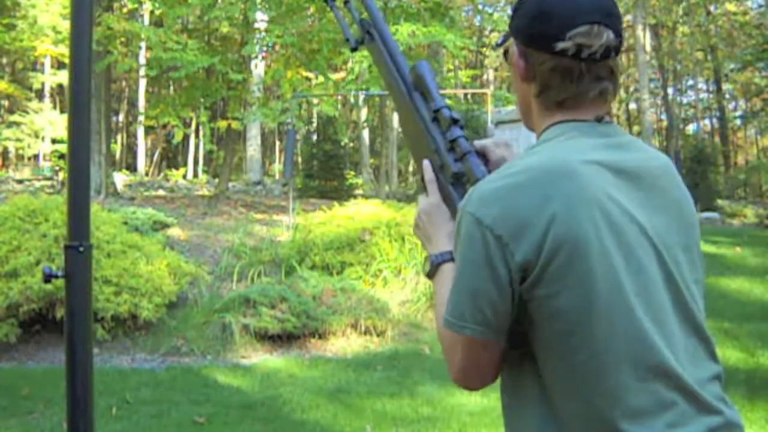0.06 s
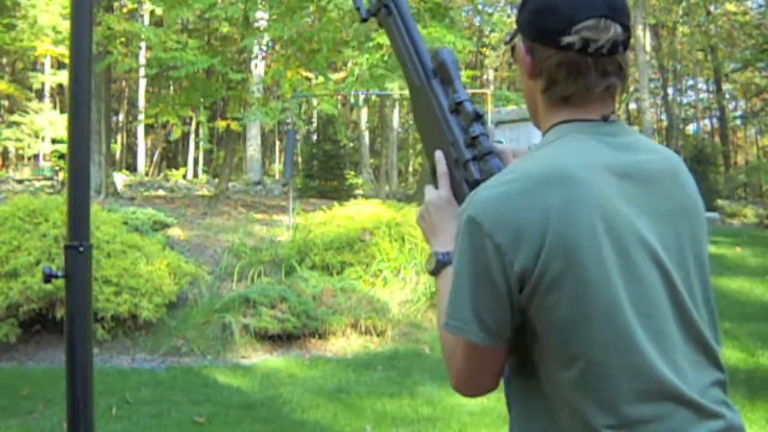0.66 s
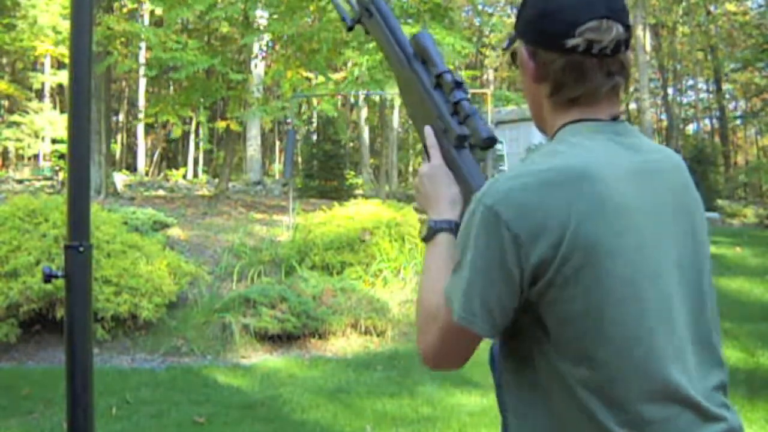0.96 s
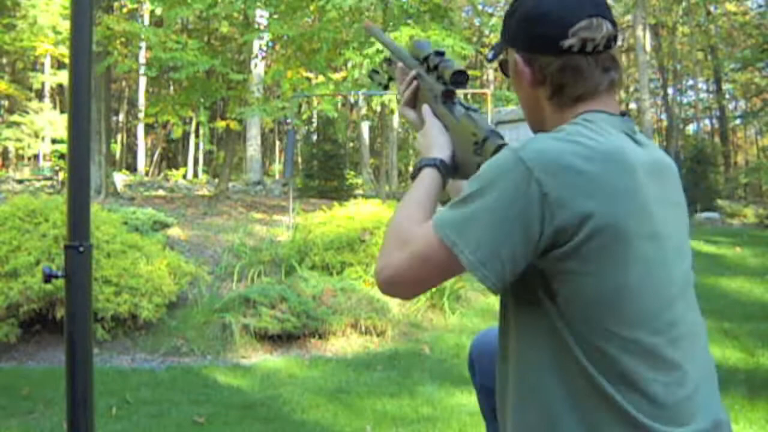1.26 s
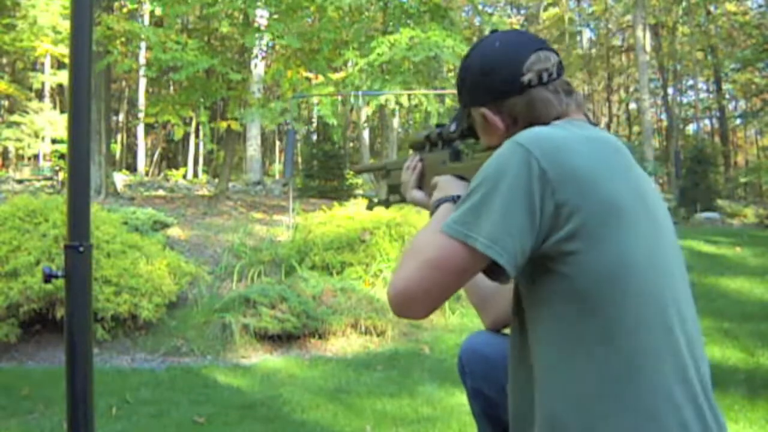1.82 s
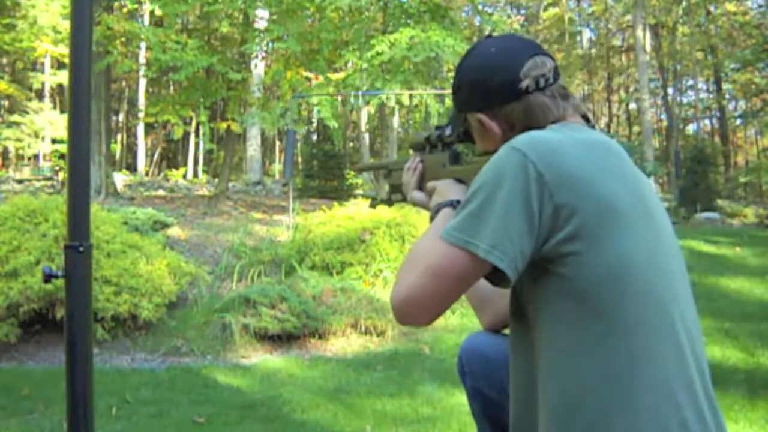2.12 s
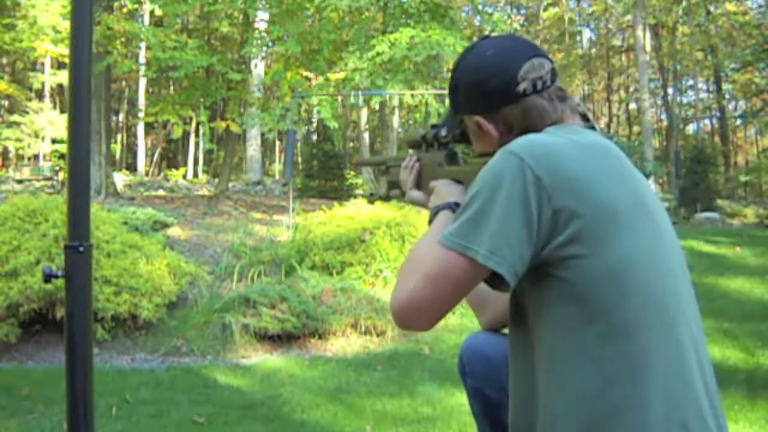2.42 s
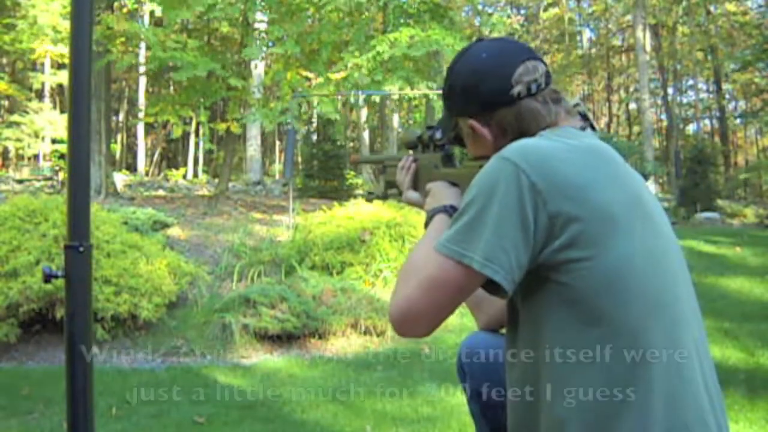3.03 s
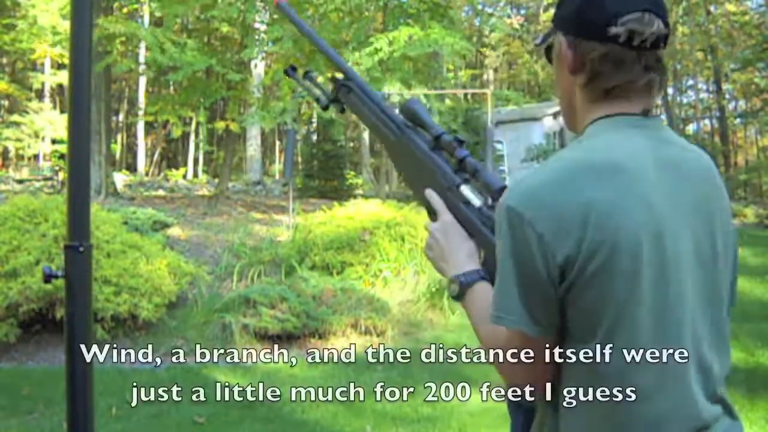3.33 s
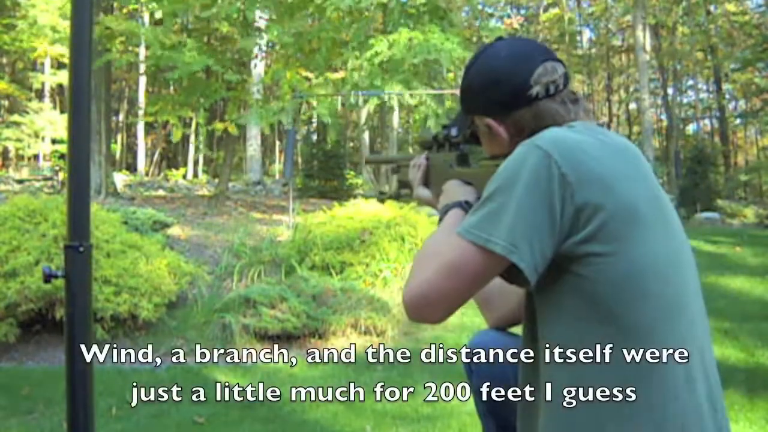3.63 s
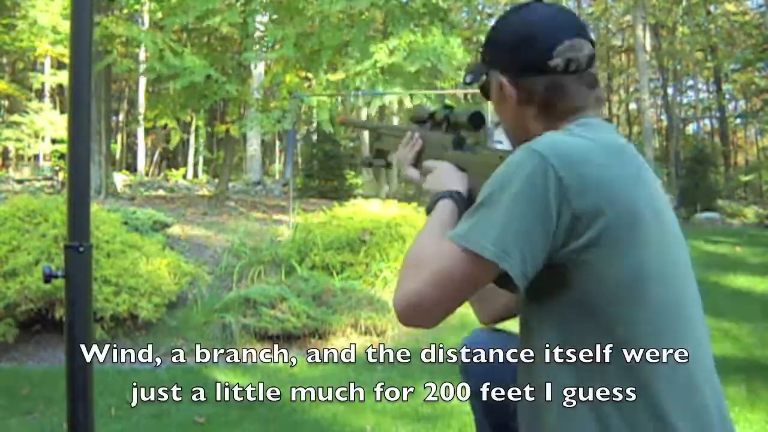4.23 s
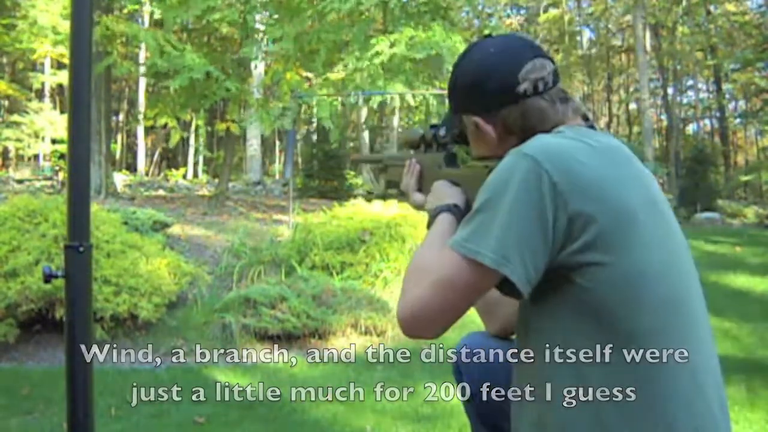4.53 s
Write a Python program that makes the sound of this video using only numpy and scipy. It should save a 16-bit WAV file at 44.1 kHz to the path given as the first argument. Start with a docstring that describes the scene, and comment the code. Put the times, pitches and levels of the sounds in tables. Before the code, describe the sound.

A spring air rifle is cocked with muffled metal clacks, then fires three quiet snaps with light bolt clicks, over soft outdoor hiss.

```python
"""Spring airsoft rifle in a garden

The rifle is cocked by hand: each impact excites the modes of the steel bolt and the hollow stock,
over dull hiss and wind on the microphone, all with almost no treble. Near 3 s the sound turns abruptly
quiet and full-range: the spring piston snaps three times and rings its air cylinder, with light bolt
ticks, the friction of a sleeve and soft bumps in between."""
import sys
import numpy as np
from scipy import signal
from scipy.fft import rfft, irfft, next_fast_len
from scipy.io import wavfile
from scipy.ndimage import uniform_filter1d

SR = 44100
rng = np.random.default_rng(int(sys.argv[2]) if len(sys.argv) > 2 else 0)


def wrap_up_sound(samples):
    """Save the sound to the file named by the first command line argument, as 16-bit audio."""
    columns = np.atleast_2d(samples).T
    # keep every value between -1 and 1, then stretch to whole-number steps
    tamed = np.clip(columns, -1, 1)
    steps = np.round(tamed * 32767).astype(np.int16)
    wavfile.write(sys.argv[1], SR, steps)


N = 206167
TIME = np.arange(N) / SR
AGE = np.arange(SR // 4) / SR  # time since an impact [s]

# Noise spectra, shape only: (frequency [Hz], spectral density [dB])
DULL_HISS_SPECTRUM = [(50, -20.5), (125, -5), (200, -2.5), (330, -3), (480, -2.5), (600, -1), (800, -2),
                      (1400, -5.5), (2200, -5.5), (3100, -5), (3800, -8), (4400, -30.5), (7000, -49.5)]
OPEN_HISS_SPECTRUM = [(25, -7), (70, -2), (120, 0), (220, 0), (310, -0.5), (450, 1.5), (600, -3),
                      (900, -6.5), (1700, -7), (3200, -8), (4700, -5.5), (6300, -6.5), (10000, -10.5),
                      (15800, -12.5)]
WIND_SPECTRUM = [(12, -3), (25, 3.5), (48, 0), (80, -5.5), (130, -16.5), (250, -35.5), (600, -67.5)]
CLOTH_SPECTRUM = [(60, -27), (160, 2.5), (290, 4), (700, -6.5), (1300, -24), (2500, -28), (8000, -50)]
TICK_SPECTRUM = [(300, -25), (1300, -21), (2600, 0.5), (5000, -1.5), (9000, -1), (13000, -11), (15500, 5.5)]
SNAP_SPECTRUM = [(170, -10.5), (380, -5), (540, 3.5), (850, -3.5), (1500, -17), (2600, -4), (3600, -1),
                 (4700, -6.5), (6200, -4.5), (8000, -15.5), (9500, -6.5), (12000, -23), (14000, -17),
                 (15500, -7.5)]
SWELL_SPECTRUM = [(200, -33), (480, -6), (620, -3.5), (800, -3.5), (1500, -28), (4000, -51)]
DRONE_SPECTRUM = [(30, -19), (85, -15), (116, 6), (150, -16.5), (400, -40), (1000, -78)]
SCUFF_SPECTRUM = [(300, -20), (700, 7), (1400, -5), (2400, -29), (8000, -45)]
SCRAPE_SPECTRUM = [(150, -21), (450, 4), (950, 5), (1600, -2.5), (2200, 1), (3400, -9), (6000, -12)]
KNOCK_SPECTRUM = [(100, -31.5), (330, -6), (1000, 4), (1600, -4), (3000, -21.5), (6000, -47.5)]
CRACK_SPECTRUM = [(200, -33), (1500, -11.5), (2100, -2.5), (3100, 5), (3800, 1.5), (6000, -6.5),
                  (12000, -19)]
GARDEN_SPECTRUM = [(100, -4.5), (300, 3.5), (600, -12), (1400, 7.5), (2200, -2), (3600, 0.5),
                   (5000, -18), (9000, -30.5)]
# Low-pass response of the first part: (frequency [Hz], gain [dB])
TREBLE_LOSS = [(3300, -0.5), (3650, -6), (3820, -14), (4000, -31), (4400, -34.5), (7000, -47), (10000, -53),
               (16000, -67.5)]

# Normal modes: (frequency [Hz], relative level [dB], 60 dB decay time [s])
CATCH_MODES = [(4850, 0, 0.07), (6400, -2, .16)]  # small catch spring
CYLINDER_MODES = [(510, 1.5, 0.023), (1178, 2, 0.027), (1555, -1.5, 0.0095), (2750, -5.5, 0.013),
                  (3300, -3, 0.015), (3960, 6.5, 0.012), (6310, -2.5, 0.025)]  # air cylinder and barrel
STEEL_MODES = [(1859, -16, 0.046), (2038, 2, 0.029), (2144, -2, 0.036), (2388, 0, 0.023),
               (2578, -0.5, 0.02), (2819, -3, 0.029), (3000, 0, 0.022), (3290, -7, 0.039), (3320, -7, .02)]  # bolt
STOCK_MODES = [(262, -8.5, 0.04), (358, -2.5, .075), (455, -5.5, 0.096), (578, 3, .042), (825, 1.5, 0.036),
               (940, 0.5, 0.043), (1015, 5, .032), (1157, 1.5, 0.035), (1390, -7, 0.03)]  # hollow stock

# Envelopes of the wind and the low drone: (time [s], level [dB])
WIND_LEVELS = [(0, -32.5), (.2, -45), (.33, -37.5), (.57, -41.5), (.71, -56), (.78, -42.5), (.86, -53),
               (1.1, -50.5), (2.24, -53), (2.3, -46.5), (2.47, -42), (2.53, -51.5), (2.95, -46.5)]
DRONE_LEVELS = [(3.9, -70.5), (4.2, -59), (4.47, -72), (4.6, -55.5), (4.67, -52)]
# Sleeve on the stock: (peak time [s], level [dB], 20 dB rise time [s], 20 dB fall time [s])
SLEEVE_STROKES = [(4.072, -50, .02, 0.13), (4.123, -45.5, 0.024, 0.031), (4.157, -58, .012, 0.053),
                  (4.23, -59.5, .06, 0.33), (4.515, -53, 0.017, 0.069), (4.67, -62, .15, .1)]
# Soft pushes of handling: (time [s], level [dB], frequency [Hz], 60 dB decay time [s])
HANDLING_BUMPS = [(0.263, -34, 55, 0.078), (0.326, -28, 55, 0.11), (0.38, -28.5, 90.6, 0.042),
                  (3.534, -54.5, 128, 0.086), (4.1924, -36, 208.4, 0.066)]
# Light contacts of the travelling bolt: (time [s], level [dB])
BOLT_TICKS = [(3.3432, -53), (3.3582, -49.5), (4.037, -42), (4.0584, -46), (4.0983, -52)]
# The bolt is pushed shut: (catch time [s], seating time [s], seating level [dB], lock level [dB])
BOLT_CLOSINGS = [(3.379, 3.4104, -37.5, -39), (4.1224, 4.1608, -38, -35)]
# Releases of the piston: (time [s], level [dB])
PISTON_SHOTS = [(3.0946, -35.5), (3.8132, -35.5), (4.579, -35)]
# The bolt scrapes along its tube: (time [s], duration [s], level [dB])
BOLT_SLIDES = [(0.2, 0.063, -40), (0.345, 0.05, -42), (0.697, 0.025, -34)]
# Cocking impacts: (time [s], steel level [dB], steel centre [Hz], stock level [dB], stock centre [Hz],
# delay of first rebound [s])
BOLT_BLOWS = [(0.044, -33.5, 2070, -29, 593, .023), (0.0465, -33, 2150, -27.5, 1090, .02),
              (0.1248, -44.5, 2200, -49, 900, .012), (0.2065, -39, 2400, -45, 900, 0.023),
              (0.3121, -36.5, 2650, -46, 800, 0.017), (0.3402, -24, 2650, -33, 652, .008),
              (0.4839, -31.5, 2490, -25, 600, 0.036), (0.566, -48.5, 2300, -40.5, 693, .02),
              (0.6896, -11, 2365, -26.5, 910, .0145), (0.725, -10.5, 2310, -17, 960, 0.022),
              (0.856, -13.5, 2778, -20, 440, 0.0088), (1.3321, -43.5, 3130, -58, 900, 0.022)]


def undb(db):
    """Amplitude ratio of a level in decibels."""
    return 10 ** (np.asarray(db) / 20)


def envelope(rows):
    """Amplitude over time, interpolated in decibels."""
    return undb(np.interp(TIME, *np.transpose(rows)))


def level_at(hz, spectrum):
    """Level [dB] of a spectrum, interpolated over logarithmic frequency."""
    points_hz, points_db = np.transpose(spectrum)
    return np.interp(np.log(hz), np.log(points_hz), points_db)


def noise(spectrum, size=len(AGE)):
    """Random-phase noise of unit rms with the given spectrum."""
    hz = np.maximum(np.fft.rfftfreq(size, 1 / SR), 1)
    x = irfft(undb(level_at(hz, spectrum)) * np.exp(2j * np.pi * rng.random(len(hz))), size)
    return x / x.std()


def filtered(x, response):
    """Zero-phase filtering: the spectrum is multiplied by a frequency response."""
    size = next_fast_len(len(x) + 2048)
    hz = np.maximum(np.fft.rfftfreq(size, 1 / SR), 1)
    return irfft(rfft(x, size) * undb(level_at(hz, response)), size)[:len(x)]


def wander(rate_hz):
    """Smooth random modulation with a spread near 1."""
    step = int(SR / rate_hz)
    return uniform_filter1d(np.repeat(rng.standard_normal(N // step + 1), step), step)[:N]


def decay(t60):
    """Exponential damping by 60 dB in t60 seconds."""
    return np.exp(-np.log(1000) * AGE / t60)


def unit(x):
    """Normalisation to the energy of 10 ms at full level."""
    return x * np.sqrt(SR / 100 / np.sum(x ** 2))


def add(out, s, x):
    """Superposition of x on out from time s."""
    i = max(int(s * SR), 0)
    out[i:i + len(x)] += x[:len(out) - i]


def delayed(x, s):
    """Pure delay of s seconds."""
    return np.concatenate([np.zeros(int(s * SR)), x])[:len(x)]


def focus(hz, centre_hz, octaves):
    """Selective excitation [dB]: the point of contact favours frequencies around a centre."""
    return -20 * np.log10(1 + (np.log2(hz / centre_hz) / octaves) ** 2 / 2)


def ring(modes, centre_hz, octaves):
    """Free vibration: a sum of damped modes, with random phase and slight detuning at each strike."""
    out = np.zeros(len(AGE))
    for hz, db, t60 in modes:
        detune, phase = rng.standard_normal(2)
        cycles = hz * (1 + 0.0031 * detune) * AGE + phase
        out += undb(db + focus(hz, centre_hz, octaves)) * decay(t60) * np.sin(2 * np.pi * cycles)
    return unit(out)


def dull_hiss():
    """Amplitude-modulated noise: a nearly even hiss whose middle band swells and sinks."""
    hiss = undb(-45.5) * noise(DULL_HISS_SPECTRUM, N) * undb(0.21 * wander(rate_hz=3.2))
    swell = noise(SWELL_SPECTRUM, N) * undb(-58 + 2.2 * wander(rate_hz=14))
    return hiss + swell


def open_air():
    """Broadband and narrowband noise: quiet garden hiss and a low drone that swells."""
    drone = noise(DRONE_SPECTRUM, N) * envelope(DRONE_LEVELS)
    hiss = undb(-55.5) * noise(OPEN_HISS_SPECTRUM, N) * undb(0.32 * wander(rate_hz=4.86))
    return hiss + drone


def wind(buffet_db=2):
    """Turbulence: the fluctuating pressure of gusts rumbles on the microphone."""
    return noise(WIND_SPECTRUM, N) * envelope(WIND_LEVELS) * undb(buffet_db * wander(rate_hz=12))


def garden_echo(direct):
    """Scattering: lawn and shrubs answer quickly, the trees faintly and for longer."""
    response = noise(GARDEN_SPECTRUM) * (decay(t60=0.16) + undb(-23) * decay(t60=0.7))
    response = delayed(response / np.sqrt(np.sum(response ** 2)), s=0.008)
    return undb(-19) * signal.fftconvolve(direct, response)[:N]


def sleeve():
    """Friction: cloth drags over the stock and catches unevenly; firm strokes also scuff."""
    strokes = sum(undb(db - 20 * np.maximum((s - TIME) / rise, (TIME - s) / fall))
                  for s, db, rise, fall in SLEEVE_STROKES)
    scuff = undb(-3) * noise(SCUFF_SPECTRUM, N) * strokes / strokes.max()
    return (noise(CLOTH_SPECTRUM, N) + scuff) * strokes * undb(3.9 * wander(rate_hz=120))


def bumps():
    """Heavily damped oscillation: soft, low pushes die within a few cycles."""
    out = np.zeros(N)
    for s, db, hz, t60 in HANDLING_BUMPS:
        onset = 1 - decay(t60=0.016)
        add(out, s, undb(db) * unit(np.sin(2 * np.pi * hz * AGE) * decay(t60) * onset))
    return out


def tick(centre_hz, octaves, t60):
    """Impulsive excitation: a small metal contact clicks and faintly rings the catch spring."""
    hz = np.geomspace(200, 16000, 80)
    spectrum = np.column_stack([hz, level_at(hz, TICK_SPECTRUM) + focus(hz, centre_hz, octaves)])
    click = unit(noise(spectrum) * decay(t60))
    return click + undb(-19.5) * ring(CATCH_MODES, centre_hz, octaves=2)


def bolt_ticks(touch_lead_s=0.0042, lock_delay_s=0.0187):
    """Light impacts of the travelling and closing bolt, each with a ground reflection."""
    out = np.zeros(N)
    for s, db in BOLT_TICKS:
        add(out, s, undb(db) * tick(centre_hz=6020, octaves=0.75, t60=0.013))
    # the catch pings, the bolt touches and then seats, and the handle locks down
    for catch_s, seat_s, db, lock_db in BOLT_CLOSINGS:
        add(out, catch_s, undb(db - 6) * tick(centre_hz=4790, octaves=0.11, t60=0.0066))
        add(out, seat_s - touch_lead_s, undb(db - 4) * tick(centre_hz=7600, octaves=0.45, t60=0.0086))
        add(out, seat_s, undb(db) * tick(centre_hz=6950, octaves=0.94, t60=0.0096))
        add(out, seat_s + lock_delay_s, undb(lock_db) * tick(centre_hz=4800, octaves=0.95, t60=0.0084))
    return out + undb(-11) * delayed(out, s=0.0026)


def piston():
    """Release of elastic energy: the sear lets go, and 3 ms later the piston lands and rings the body."""
    out = np.zeros(N)
    release = unit(noise(SNAP_SPECTRUM) * decay(t60=0.026) * (1 - decay(t60=0.0035)))
    landing = unit(noise(SNAP_SPECTRUM) * decay(t60=0.015))
    body = ring(CYLINDER_MODES, centre_hz=2500, octaves=2.3)
    snap = unit(release + delayed(landing, s=0.002907) + undb(4) * delayed(body, s=0.002597))
    # the spring repeats the same snap; its chatter varies
    for s, db in PISTON_SHOTS:
        chatter = unit(noise(SNAP_SPECTRUM) * decay(t60=0.028))
        add(out, s, undb(db) * (snap + undb(-6) * chatter))
    return out


def contacts(rebounds=2, gap_s=0.013, loss_db=8.5):
    """Inelastic collision: each blow is followed by fading rebounds, which mostly shake the stock."""
    for s, steel_db, steel_hz, stock_db, stock_hz, rebound_s in BOLT_BLOWS:
        yield s, steel_db, steel_hz, stock_db, stock_hz
        for k in range(rebounds):
            db = steel_db - k * loss_db
            yield s + rebound_s + k * gap_s, db - 21, steel_hz, db - 16, stock_hz


def steel_clack(db, centre_hz, firm_db=-17, knee_hz=3100):
    """Contact time limits bandwidth: a softer blow on the ringing steel lasts longer and cracks duller."""
    tilt_db_per_octave = 0.16 * (db - firm_db)
    spectrum = [(hz, level + tilt_db_per_octave * max(np.log2(hz / knee_hz), 0))
                for hz, level in CRACK_SPECTRUM]
    crack = unit(noise(spectrum) * decay(t60=0.02))
    clack = ring(STEEL_MODES, centre_hz, octaves=0.4) + undb(-1.5) * crack
    return unit(clack * (1 - decay(t60=0.003)))


def stock_knock(steel_lead_db, centre_hz, doubling_db=4):
    """Resonance and inertia: the hollow stock rings and, being heavier, starts later than the steel."""
    # the more a contact is steel on steel, the wider the range of stock modes it reaches
    octaves = min(0.26 * 2 ** (steel_lead_db / doubling_db), 1.1)
    modes = ring(STOCK_MODES, centre_hz, octaves)
    thud = unit(noise(KNOCK_SPECTRUM) * decay(t60=0.04))
    return unit((modes + undb(-4.5) * thud) * (1 - decay(t60=0.0053)))


def bolt():
    """Impact and sliding friction: the bolt strikes steel and stock and scrapes along its tube."""
    out = np.zeros(N)
    for s, steel_db, steel_hz, stock_db, stock_hz in contacts():
        add(out, s, undb(steel_db) * steel_clack(steel_db, steel_hz))
        add(out, s, undb(stock_db) * stock_knock(steel_db - stock_db, stock_hz))
    for s, length, db in BOLT_SLIDES:
        stroke = np.sin(np.pi * np.minimum(AGE / length, 1))
        add(out, s, undb(db) * stroke * noise(SCRAPE_SPECTRUM))
    return out


def scene(switch_s=2.957, ceiling_db=-1.5):
    """Superposition in two parts: loud, muffled cocking gives way abruptly to quiet, full-range shots."""
    handling = bumps()
    clacks = bolt()
    cocking = clacks + garden_echo(clacks) + handling + dull_hiss() + wind()
    # the microphone rounds off the hardest clacks
    rounded = cocking / (1 + (cocking / undb(ceiling_db)) ** 4) ** 0.25
    muffled = filtered(rounded, TREBLE_LOSS)
    firing = piston() + bolt_ticks() + handling + sleeve() + open_air()
    return np.where(TIME < switch_s, muffled, firing)[None]


def record(dry, cutoff_hz=15850):
    """Noise floor and band limit: a trace of electronic hiss, then a steep low-pass filter."""
    lowpass = signal.ellip(10, 0.2, 70, cutoff_hz, fs=SR, output="sos")
    return signal.sosfilt(lowpass, dry + undb(-93) * rng.standard_normal(dry.shape))


dry = scene()
out = record(dry)
wrap_up_sound(out)
```